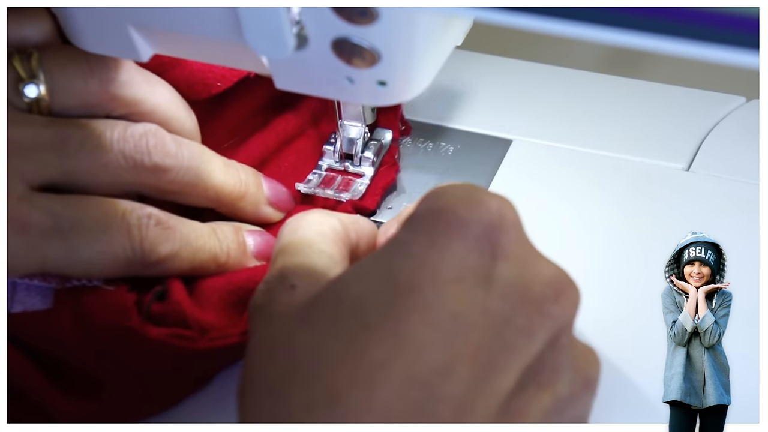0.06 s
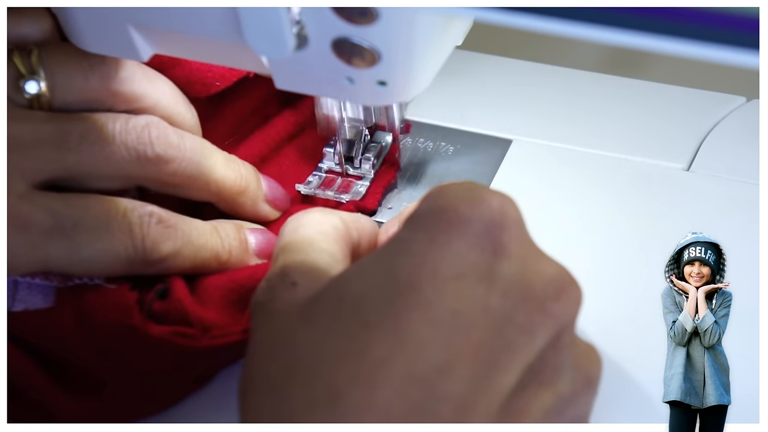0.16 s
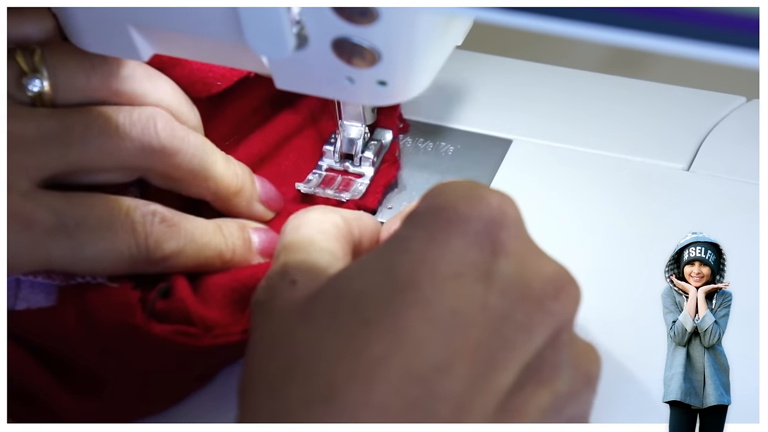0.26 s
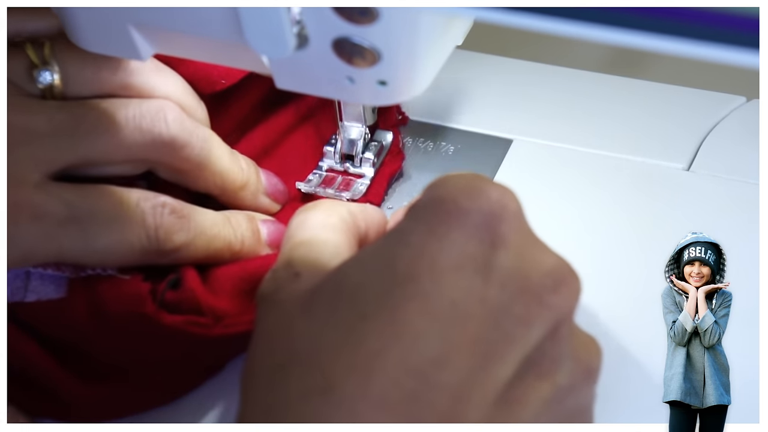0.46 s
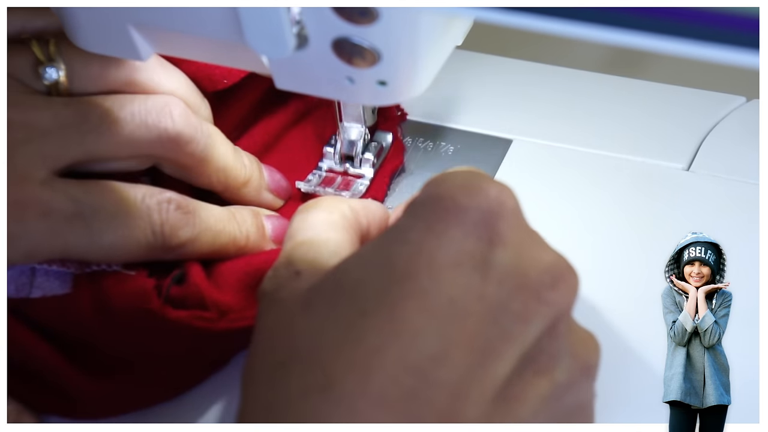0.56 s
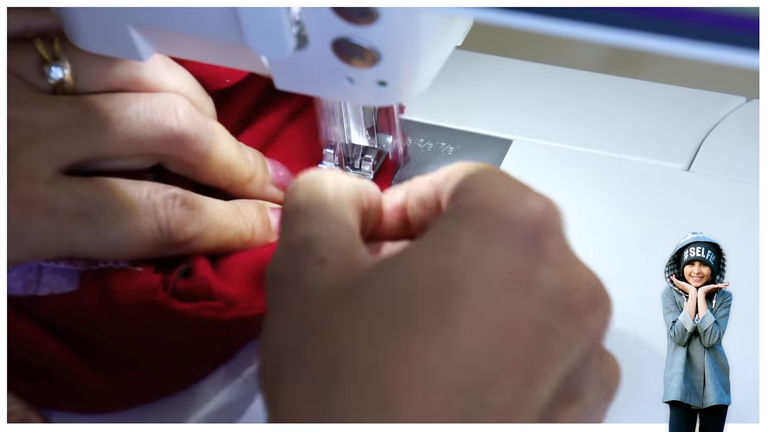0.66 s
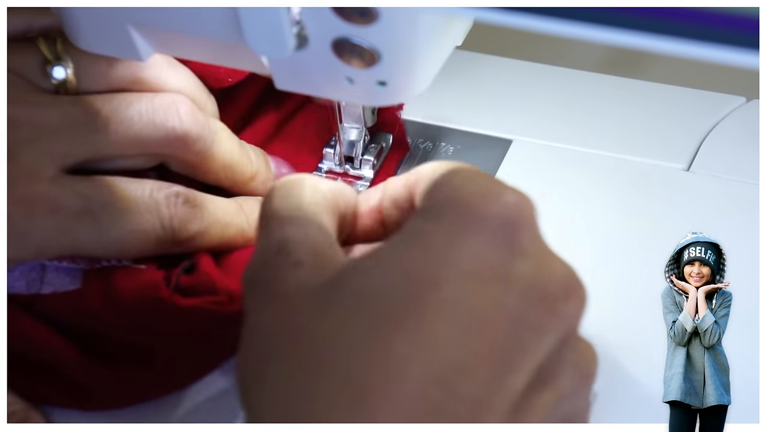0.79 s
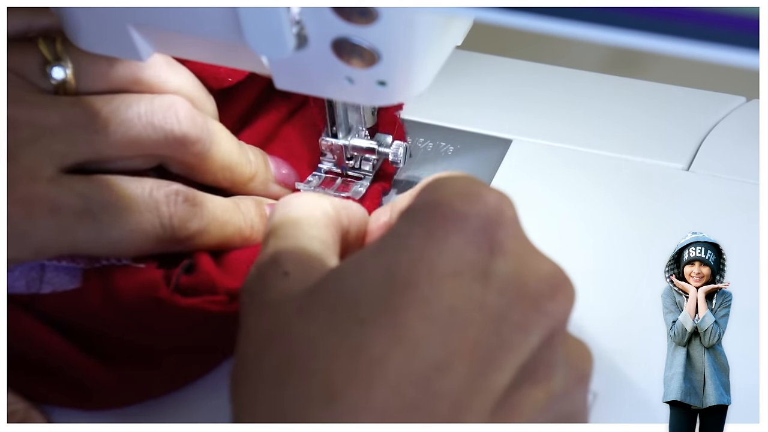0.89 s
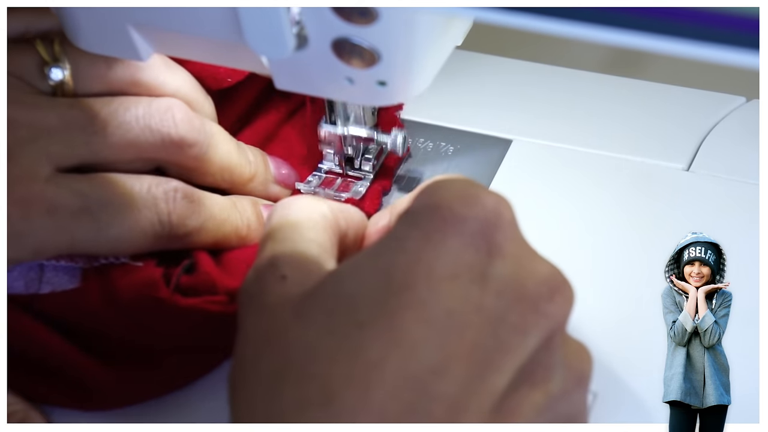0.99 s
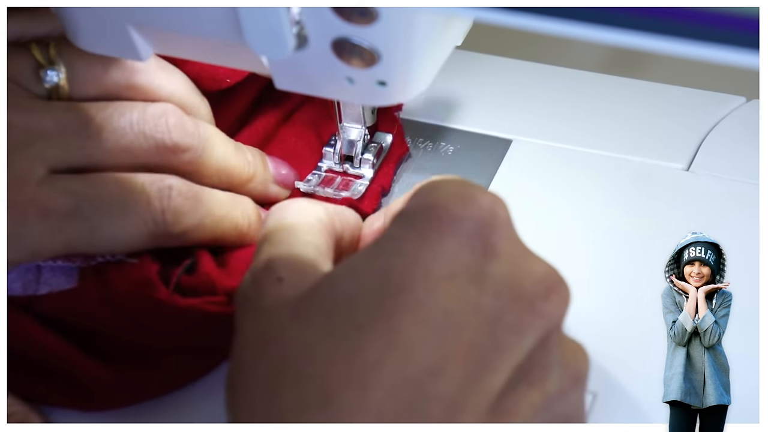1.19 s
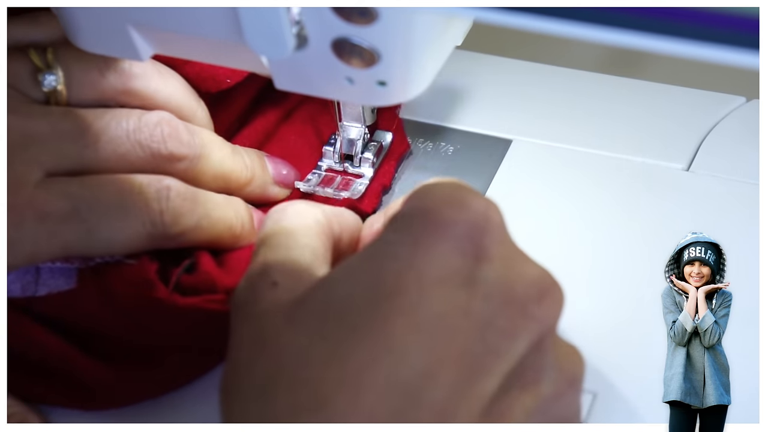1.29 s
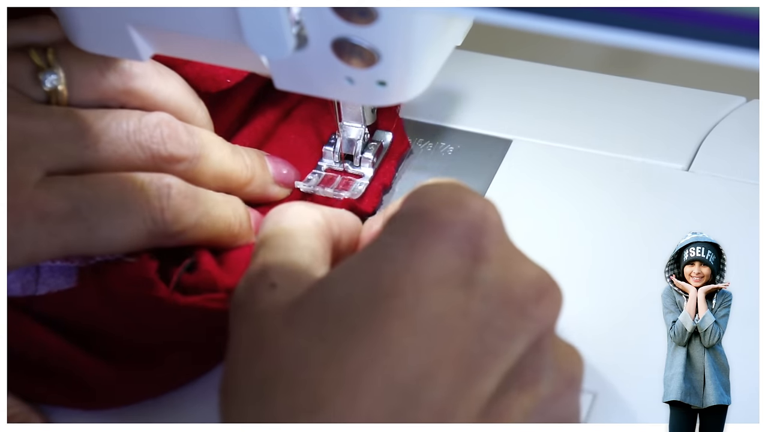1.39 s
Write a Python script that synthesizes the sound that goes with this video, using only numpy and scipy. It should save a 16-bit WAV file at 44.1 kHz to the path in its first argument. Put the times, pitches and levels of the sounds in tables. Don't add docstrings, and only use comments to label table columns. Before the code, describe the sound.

An electric sewing machine close up: faint cloth rustle, motor winding up with a rising whine, six quick metallic stitches, a fast wind-down, then light hand bumps and tiny ticks in a quiet small room.

```python
import sys
import numpy as np
from scipy import signal
from scipy.fft import rfft, irfft
from scipy.io import wavfile
from scipy.ndimage import uniform_filter1d

SR = 44100
rng = np.random.default_rng(int(sys.argv[2]) if len(sys.argv) > 2 else 0)


def generate_wav(signal):
    frames = np.transpose(np.atleast_2d(signal))
    scaled = np.clip(frames, -1, 1) * 32767
    pcm = np.round(scaled).astype(np.int16)
    wavfile.write(sys.argv[1], SR, pcm)


def to_linear_factor(level_db):
    exponent = np.asarray(level_db, float) / 20
    return 10 ** exponent


N = 63945
T = np.arange(N) / SR


def evened(x):
    return x / np.sqrt(np.mean(x ** 2) + 1e-20)


def read(points, hz):
    f, value = np.transpose(points)
    return np.interp(np.log(hz + 1), np.log(f + 1), value)


def coloured(points):
    hz, low_hz = np.fft.rfftfreq(N, 1 / SR), points[0][0]
    gain = to_linear_factor(read(points, hz)) * np.minimum(hz / low_hz, 1) ** 2
    return evened(irfft(rfft(rng.standard_normal(N)) * gain, N))


def wobble(span_s):
    k = max(int(span_s * SR), 2)
    return evened(uniform_filter1d(uniform_filter1d(rng.standard_normal(N), k), k))


def resonate(x, hz, width_hz):
    turn = np.exp(2j * np.pi * np.cumsum(hz * np.ones(len(x))) / SR)
    r = np.exp(-np.pi * width_hz / SR)
    return 2 * (turn * signal.lfilter([1 - r], [1, -r], x / turn + 1e-18)).real


def line(hz, width_hz, pure):
    tone = np.sin(2 * np.pi * np.cumsum(hz) / SR)
    fuzz = resonate(resonate(rng.standard_normal(N), hz, width_hz), hz, width_hz)
    return evened(pure * tone + evened(fuzz))


def blow(blow_s):
    t = np.arange(3000) / SR
    rattle_db = 3.2 * uniform_filter1d(rng.standard_normal(len(t)), 36) * 4.9
    fade = np.exp(-(t / blow_s) ** 2) + 0.19 * np.exp(-t / (3.4 * blow_s))
    return rng.standard_normal(len(t)) * to_linear_factor(rattle_db) * np.minimum(t / 0.002, 1) * fade


def add(mix, s, sound):
    spot = mix[round(s * SR):][:len(sound)]
    spot += sound[:len(spot)]


# time in seconds, level in dB.
MOTOR_LOAD = [(0.127, -42), (.2, -43.5), (0.291, -41.5), (0.361, -37.5), (0.491, -34), (0.618, -32),
              (0.728, -34), (0.764, -39.5), (.8, -43), (.86, -46.5), (.9, -61)]


def load():
    s, db = np.transpose(MOTOR_LOAD)
    start = np.clip((T - s[0]) / 0.0046, 0, 1)
    stop = np.clip((s[-1] - T) / 0.03, 0, 1)
    return to_linear_factor(np.interp(T, s, db)) * start * stop


# frequency in Hz, density in dB per Hz.
FLOOR_SPECTRUM = [(350, -41), (600, -23), (994, -42), (1190, -11.5), (2440, -15), (4570, -10),
                  (6340, -18.5), (10500, -17), (15600, -49)]
# frequency in Hz, density in dB per Hz.
RUMBLE_SPECTRUM = [(15, -18), (38, -1), (65, -5.5), (82, -15.5), (110, -3), (160, -26.5)]
FLOOR_DB, RUMBLE_DB = -67, -60.5


def background():
    hiss = to_linear_factor(FLOOR_DB + wobble(0.017)) * coloured(FLOOR_SPECTRUM)
    rumble = to_linear_factor(RUMBLE_DB) * coloured(RUMBLE_SPECTRUM + [(400, -44)])
    return hiss + rumble * (1 + 40 * load())


# time in seconds, level in dB.
HUM_LEVEL = [(0, -55), (.28, -56), (.33, -45), (.47, -52), (.55, -37), (.64, -38), (.68, -45), (.74, -40),
             (.8, -49), (.9, -51), (1., -55), (1.28, -53), (1.31, -60), (1.35, -52), (1.39, -55),
             (1.41, -66)]
HUM_HZ = 181


def hum():
    s, db = np.transpose(HUM_LEVEL)
    pitch_hz = HUM_HZ * (1 + .015 * wobble(.05))
    return to_linear_factor(np.interp(T, s, db) + 1.5 * wobble(.03)) * line(pitch_hz, 22, 2.5)


# start in seconds, length in seconds, centre in Hz.
CLOTH_RUBS = [
    (.13, .075, 2200),
    (.01, .12, 4000),
    (1.1, .035, 6000),
    (1.245, .12, 3300),
    (.81, .075, 4200),
]
CLOTH_DB = [-50, -63, -67.5, -63.5, -82]


def cloth():
    out = np.zeros(N)
    for (s, length_s, hz), db in zip(CLOTH_RUBS, CLOTH_DB):
        u = np.clip((T - s) / length_s, 0, 1)
        rustle = coloured([(hz * .5, -6), (hz, 0), (hz * 2.0, -5), (hz * 3.0, -20), (hz * 5, -45)])
        envelope = np.minimum(u / 0.036, 1) * np.sqrt(1 - u ** 2)
        out += to_linear_factor(db + wobble(0.0018)) * envelope * rustle
    return out


# time in seconds, peak in dB, pitch in Hz.
TICK_EVENTS = [(0.017, -59.5, 11500), (0.021, -59, 6600), (0.03, -48.5, 4000), (.031, -55.5, 7000),
               (.171, -58.5, 8400), (0.215, -57, 11500), (0.248, -52.5, 8500), (.36, -64, 12500),
               (.46, -60, 12400), (0.548, -50, 12400), (1.105, -60, 10500), (1.261, -63, 11300),
               (1.264, -58, 3950), (1.276, -48, 3780), (1.275, -53.5, 7160), (1.276, -66, 11300),
               (1.309, -58, 9250), (1.309, -65, 12400), (1.31, -61, 6500), (1.316, -49.5, 3730),
               (1.352, -62, 4000), (.4455, -52, 6500), (.533, -38, 5500), (.5385, -43, 7940),
               (.621, -36, 4870), (.7015, -50, 4600), (.713, -40.5, 7000), (.802, -57, 7000),
               (1.332, -65, 7000), (1.309, -57, 10600), (.793, -41.5, 3900), (.845, -50, 3620),
               (.175, -66.5, 14000), (.216, -67, 14500), (1.311, -64, 14500), (0.114, -59, 7000),
               (.105, -62, 4370)]
TICK_T60_S = 0.0065


def ticks():
    out = np.zeros(N)
    for s, db, hz in TICK_EVENTS:
        fuzz = resonate(resonate(blow(.0025), hz, hz * .2), hz, hz * .2)
        ring = resonate(fuzz, hz, 2.2 / TICK_T60_S)
        add(out, s, 5 * to_linear_factor(db) * (fuzz + .25 * ring))
    return out


# frequency in Hz, width in Hz, level in dB.
CASE_MODES = [(97, 6.8, -21), (174.3, 22.7, -2), (238.6, 29, -3.5), (274, 21.5, -7), (315.3, 35, -7.5),
              (373.3, 28.5, -5), (469, 38.6, -10), (560.3, 36.4, -13.5), (604, 35, -12.5), (633, 79.4, -12),
              (760, 150, -16), (825.3, 67, -19.5)]
# time in seconds, level in dB.
TABLE_BUMPS = [(0.134, -38), (0.236, -30), (0.321, -25.5), (0.38, -24.5), (0.564, -28.5), (0.577, -27.5),
               (0.602, -34), (0.685, -20), (0.893, -34.5), (0.998, -44.5), (1.038, -50), (1.078, -43),
               (1.184, -39), (1.212, -56), (1.264, -39), (1.284, -39.5), (1.335, -37.5), (1.355, -47),
               (1.426, -41)]
THUMP_DB, SHAKE_DB, BUMP_DB = 1, 2, -16.5
IDLE_DB, IDLE_LULL_S, KNOCKS_PER_S = -48, 1.395, 140


def case():
    knocks = evened((rng.random(N) < KNOCKS_PER_S / SR) * rng.uniform(-0.72, 1, N))
    shake = rng.standard_normal(N)
    thump, bump = np.zeros((2, N))
    for s, _ in HOOK_CLICKS + BAR_CLICKS + DOG_CLICKS + LEVER_CLICKS:
        add(thump, s, rng.choice([-50., 50.], 1))
    for s, db in TABLE_BUMPS:
        add(bump, s, 120 * to_linear_factor(db + BUMP_DB) * np.diff(np.hanning(40)))
    running = load() * (to_linear_factor(SHAKE_DB) * (0.84 * shake + 0.9 * knocks) + to_linear_factor(THUMP_DB) * thump)
    idle_db = IDLE_DB + 1.85 * wobble(0.02) - 8.7 * (T > IDLE_LULL_S)
    drive = running + to_linear_factor(idle_db) * (shake + 1.14 * knocks) + bump
    drive = signal.lfilter(*signal.butter(2, 140, "high", fs=SR), drive)
    out = np.zeros(N)
    for k, (hz, width_hz, db) in enumerate(CASE_MODES):
        mode = resonate(drive, hz, width_hz) / np.sqrt(2 * np.pi * width_hz / SR)
        out += (-1) ** k * to_linear_factor(db) * mode
    return out / 2


# frequency in Hz, density in dB per Hz.
GEAR_HISS = [(500, 6), (850, -3.5), (1400, -6.5), (2300, -9), (3200, -4.5), (7200, -13), (11500, -20),
             (15600, -32)]
HISS_DB, HISS_SLOPE = -13, 0.97
RATTLE_PER_S, GRIT = 180, 0.16


def gears():
    share = load() / load().max()
    hits = rng.random(N) < RATTLE_PER_S * share / SR
    rattle = hits * to_linear_factor(4.5 * np.minimum(rng.exponential(1, N), 2.5))
    decay = np.exp(-1 / (0.0036 * SR))
    grit = 1 + GRIT * evened(signal.lfilter([1], [1, -decay], rattle))
    level = load() * to_linear_factor(HISS_DB + 2.55 * wobble(0.025)) * (share + 1e-6) ** (HISS_SLOPE - 1)
    return level * coloured(GEAR_HISS) * grit


# time in seconds, pitch in Hz.
MOTOR_SPEED = [(.12, 545), (.2, 760), (.3, 950), (.34, 1095), (.385, 1165), (.47, 1325), (.5, 1420),
               (.55, 1495), (.6, 1550), (.66, 1570), (.7, 1440), (.73, 1350), (.8, 1100)]
# multiple of the whine, level in dB, line width in Hz, resonance in Hz, its reach in Hz.
MOTOR_PARTIALS = [(1, -19.5, 50, 1450, 150), (2, -19.5, 80, 2880, 90), (2, -23, 80, 3120, 80),
                  (3, -16.5, 80, 3380, 150)]
# time in seconds, pitch in Hz, level in dB.
BELT_HUM = [(.28, 350, -56), (.34, 385, -43), (.39, 430, -39), (.43, 470, -38), (.5, 490, -37.5),
            (.54, 505, -41), (.58, 535, -42), (.7, 550, -45), (.77, 500, -55)]
# time in seconds, pitch in Hz, level in dB.
SHAFT_HUM = [(.3, 165, -56), (.34, 185, -41), (.39, 198, -37), (.44, 215, -43), (.5, 240, -39),
             (.56, 258, -38), (.61, 292, -34), (.64, 270, -42), (.7, 300, -39), (.76, 250, -50)]
WHINE_END_S = .74


def whine():
    speed_hz = uniform_filter1d(np.interp(T, *np.transpose(MOTOR_SPEED)), 600)
    out = np.zeros(N)
    for k, db, width_hz, at_hz, reach_hz in MOTOR_PARTIALS:
        nearness = np.exp(-((k * speed_hz - at_hz) / reach_hz) ** 2)
        out += to_linear_factor(db + 2.5 * wobble(0.012)) * nearness * line(k * speed_hz, width_hz, 1.5)
    out *= load() * np.clip((WHINE_END_S - T) / .03, 0, 1)
    for s, hz, db in (np.transpose(BELT_HUM), np.transpose(SHAFT_HUM)):
        out += to_linear_factor(np.interp(T, s, db, -120, -120)) * line(np.interp(T, s, hz), 20, 3)
    return out


CLACK_HZ, RING_DB, PITCH_SPREAD = 1700, -12, .05


def part(events, ring, blow_s):
    out = np.zeros(N)
    for s, level_db in events:
        hit = blow(blow_s)
        for mode_hz, db, t60_s in ring:
            slip, luck = rng.standard_normal(2)
            hz = mode_hz * (1 + PITCH_SPREAD * slip)
            clack = resonate(resonate(hit, hz, CLACK_HZ), hz, CLACK_HZ)
            sound = clack + to_linear_factor(RING_DB) * resonate(clack, hz, 2.2 / t60_s)
            add(out, s, 3 * to_linear_factor(level_db + db + 1.5 * luck) * sound)
    return out


# time in seconds, peak in dB.
HOOK_CLICKS = [(0.2932, -41), (0.408, -38.5), (0.5029, -39), (0.5867, -36.5), (0.666, -37.5),
               (0.7667, -41.5)]
BAR_CLICKS = [(0.3146, -35), (0.4251, -30), (0.5155, -29), (0.6001, -31), (0.677, -29), (0.7917, -42.5)]
DOG_CLICKS = [(0.3371, -43), (0.4412, -28.5), (0.5311, -29), (0.6144, -25), (0.6948, -29), (0.7024, -35),
              (0.8482, -48)]
LEVER_CLICKS = [(0.3793, -27), (0.4743, -19.5), (0.5626, -16), (0.6427, -14), (0.7302, -21.5)]
# frequency in Hz, level in dB, t60 in seconds.
HOOK_MODES = [(5700, -18, .03), (6500, 6, 0.018), (7000, 3.5, 0.025), (7300, 9, 0.031), (8900, -8, .02),
              (11300, -0.5, 0.038)]
BAR_MODES = [(2800, -30, 0.043), (4000, -7.5, 0.026), (4980, -3, .04), (6600, -1.5, 0.036),
             (8180, -7, 0.036), (9000, -18, 0.033), (10800, -11.5, 0.015), (13300, -44, .02)]
DOG_MODES = [(2800, -33, .06), (4560, -5, 0.1), (6230, -5, 0.022), (7260, -12, 0.056), (7950, -16, 0.048),
             (10100, -13, 0.028)]
LEVER_MODES = [(3520, -18, 0.067), (4600, -7.5, 0.031), (5930, -5, .03), (7500, -12, .03),
               (8500, -17.5, .02)]
CLICK_DB = -9


def stitches():
    hook = part(HOOK_CLICKS, HOOK_MODES, 0.0044)
    bar = part(BAR_CLICKS, BAR_MODES, 0.01)
    dog = part(DOG_CLICKS, DOG_MODES, 0.0095)
    lever = part(LEVER_CLICKS, LEVER_MODES, 0.0017)
    return to_linear_factor(CLICK_DB) * (hook + bar + dog + lever)


def sparse_tail(t60_s, start_s):
    at = 20 * np.arange(SR // 40) + rng.integers(0, 20, SR // 40)
    taps = np.zeros(SR // 2)
    taps[at] = rng.choice([-1., 1.], len(at)) * to_linear_factor(-60 * at / SR / t60_s) * (at >= start_s * SR)
    return taps / np.linalg.norm(taps)


METAL_TOP_HZ, ROOM_DB, ROOM_T60_S = 13300, -7, 0.31


def machine():
    metal = signal.lfilter(*signal.butter(2, METAL_TOP_HZ, fs=SR), stitches() + ticks())
    near = metal + gears() + case() + cloth() + whine() + hum()
    echo = signal.fftconvolve(near, sparse_tail(ROOM_T60_S, 0.0036))[:N]
    return near + to_linear_factor(ROOM_DB) * echo + background()


# frequency in Hz, likeness from 0 to 1.
PORT_LIKENESS = [(40, 1), (150, 0.88), (380, 1), (950, 1), (2400, 0.38), (6000, 0.82), (10000, 0.75),
                 (13000, 0.22), (15000, 0.18)]
# frequency in Hz, level in dB.
PORT_BALANCE = [(60, 6.5), (150, -1.5), (380, -1.5), (950, -1), (2380, -1.0), (5980, -0.5), (10000, -0.5),
                (13500, -4.5)]
# frequency in Hz, lead in rad.
PORT_LEAD = [(0, -0.65), (340, 0.96), (3100, 0.34), (5940, 0.51), (10700, -1.05), (11100, -0.7),
             (14500, 0.88), (15300, -0.58)]


def ports(a, b):
    hz, a, b = np.fft.rfftfreq(N, 1 / SR), rfft(a), rfft(b)
    same = np.clip(read(PORT_LIKENESS, hz), 0, 1)
    turn = to_linear_factor(read(PORT_BALANCE, hz) / 2) * np.exp(.5j * read(PORT_LEAD, hz))
    return irfft([a * turn, (same * a + np.sqrt(1 - same ** 2) * b) / turn], N)


def scene():
    return ports(machine(), machine())


def top_cut(x):
    return signal.sosfilt(signal.butter(12, 15750, fs=SR, output="sos"), x)


def record(dry):
    low_pass = signal.firwin(511, 15700, window=("kaiser", 9), fs=SR)
    mix = signal.oaconvolve(dry, low_pass[None], "same")
    return top_cut(mix)


dry = scene()
out = record(dry)
generate_wav(out)
```